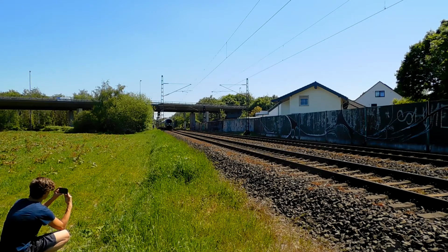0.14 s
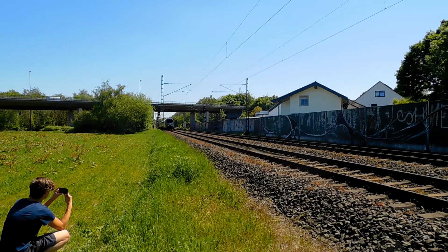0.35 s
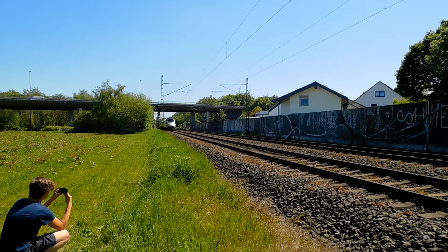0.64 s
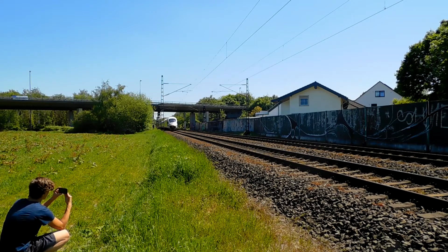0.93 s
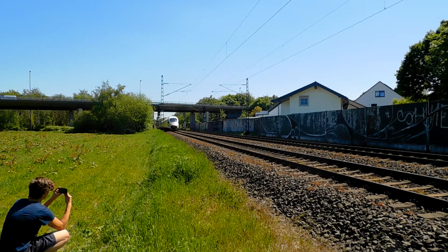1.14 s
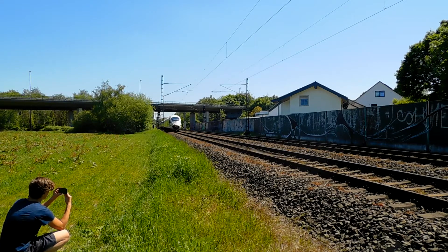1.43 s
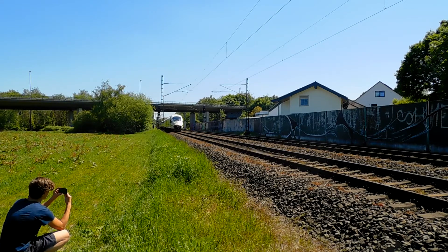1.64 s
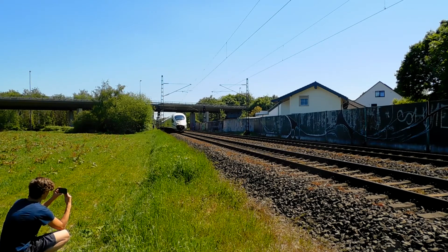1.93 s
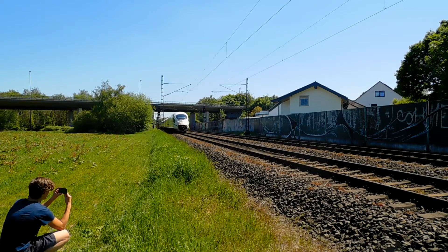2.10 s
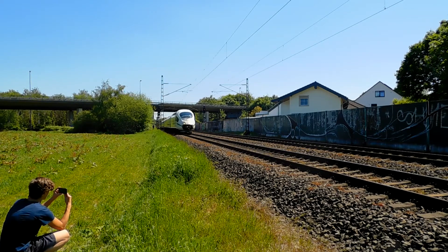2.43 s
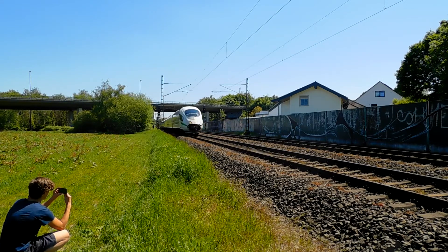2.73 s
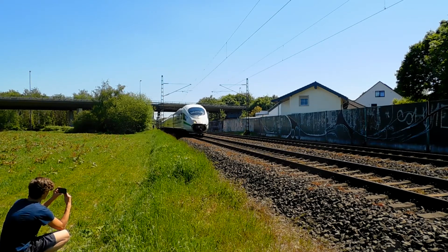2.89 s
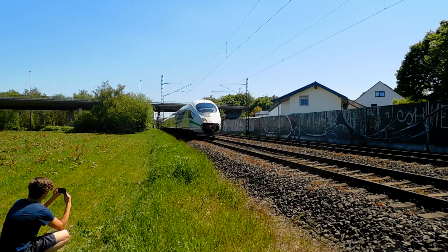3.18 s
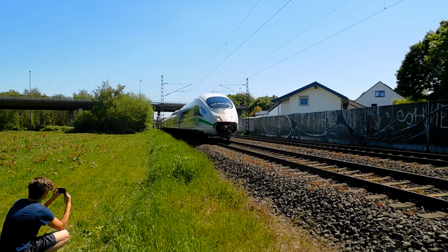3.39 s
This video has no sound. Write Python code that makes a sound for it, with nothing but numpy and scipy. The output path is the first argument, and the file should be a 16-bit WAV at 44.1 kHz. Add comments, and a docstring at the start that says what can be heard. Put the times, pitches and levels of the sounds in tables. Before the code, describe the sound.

Train approaching outdoors: faint rail ringing and traffic wash first, then irregular chirpy knocks grow louder with thin high hiss, and wheel and air roar builds last. Close-spaced stereo microphones stand beside the track.

```python
"""A fast electric train nears an open trackside, heard by two close microphone ports.
From the start: suburb and ground rumble (shaped noise), gusty wind (low noise), a dull wash that soon dies
(resonant noise), rail ring around 1 kHz (noise-driven resonances) and rail sizzle with a thin whistle.
From 0.2 s sliding tone bursts knock about ten times a second and ring the rail. Wheel and air roar (shaped
noise) first drops, stays low until about 0.7 s, then swells toward the end.
Near 3.2 s one faint bright snap: a noise burst with a short tone."""
import sys
import numpy as np
from scipy import signal
from scipy.fft import rfft, irfft
from scipy.io import wavfile

SR = 44100
rng = np.random.default_rng(int(sys.argv[2]) if len(sys.argv) > 2 else 0)


def generate_wav(sig):
    """Save sig (samples, or channels by samples) to the path in sys.argv[1] as 16-bit PCM at SR."""
    pcm = np.round(np.clip(np.atleast_2d(sig).T, -1, 1) * 32767).astype(np.int16)
    wavfile.write(sys.argv[1], SR, pcm)


def gain_from_db(level_db):
    """Turn a decibel level (scalar or array-like) into a linear amplitude factor."""
    decades = np.asarray(level_db, float) / 20
    return 10 ** decades


N = 156555
SECONDS, HZ = np.arange(N) / SR, np.fft.rfftfreq(N, 1 / SR)
REF_S = 2.5  # time at which gliding and swelling settings hold

# Traffic wash and high hiss. Each row: frequency in Hz, relative density in dB per Hz.
SUBURB_SPECTRUM = [(71, -56), (120, -21), (300, -17), (469, -4.5), (575, -5.5), (750, -1.5), (1170, 0),
                   (1430, -2.5), (2000, -6), (2750, -13.5), (3730, -25), (5000, -46), (7000, -77),
                   (8300, -57), (10300, -64), (12500, -33), (15500, -35)]
SUBURB_DB = -41.5
# Ground rumble. Each row: frequency in Hz, relative density in dB per Hz.
RUMBLE_SPECTRUM = [(30, -13), (60, -1.5), (95, -4.5), (130, -15), (200, -13), (300, -43)]
RUMBLE_START_DB, RUMBLE_SWELL_DB_PER_S, RUMBLE_PATCHY_DB = -68, 4, 2
# Gusts on the ports. Each row: time in seconds, level in dB.
WIND_GUSTS = [(0.0, -59), (0.16, -59.5), (0.77, -73), (1.0, -65), (1.16, -69), (1.18, -55.5), (1.54, -63.5),
              (1.6, -86), (1.72, -58), (3.12, -74), (3.44, -70), (3.55, -79)]
WIND_LOW_HZ, WIND_TOP_HZ = 18, 59
WASH_START_DB, WASH_FADE_S, WASH_HZ, WASH_WIDTH_HZ = -43.5, 0.15, 715, 240

# Source strengths before trims. Each row: time in seconds, rail ring, wheel and air roar, rail sizzle in dB.
APPROACH_LEVELS = [(0.0, -52, -53.5, -75.5), (0.04, -44.5, -61, -66), (0.68, -45.5, -61, -66.5),
                   (1.1, -38.5, -57.5, -62.5), (1.41, -40, -58.5, -62.5), (1.71, -31, -55, -55.5),
                   (1.96, -33.5, -52, -57), (2.32, -32, -51.5, -53), (2.44, -31, -50.5, -51.5),
                   (2.71, -35.5, -50.5, -53), (3.0, -30, -48, -52.5), (3.18, -31, -45, -48.5),
                   (3.5, -34, -41, -48), (3.55, -29, -38.5, -49)]
RAIL_TRIM_DB, ROAR_TRIM_DB, SIZZLE_TRIM_DB = 0.5, 13, 1.5
# Ringing bands of the rail. Each row: centre in Hz at REF_S, width of one resonator pass in Hz,
# relative level in dB at REF_S, extra swell in dB per s, glide in Hz per s.
RAIL_RESONANCES = [(468.8, 23.5, -19.5, 7.5, 3), (661.5, 72, -12, 5.5, -7), (844, 117, -12, 5, -6),
                   (967, 92, -8, -2.5, -6), (1062.4, 59, -1.5, 2, -39), (1145, 83, -6, -1, -9.5),
                   (1305.4, 121, -2, -1.5, -4), (1415, 69, -3, 0.5, -3), (1469, 18, -6.5, 6.5, 2.7),
                   (1501, 56, -9.5, -4.5, -8.5), (1582.5, 32, -8.5, -0.5, -8), (1681, 127, -11.5, -1.5, -6),
                   (2120, 400, -31.5, 0, 11), (2346, 230, -13.5, 0, -2)]
RAIL_FLUTTER_DB, RAIL_FLUTTER_HZ = 2.5, 10.6
RAIL_WANDER_SHARE, RAIL_WANDER_HZ = 0.008, 7  # pitch spread as a share of the centre
RATTLE_DB, RATTLE_RISE_S = -10, 0.011
RATTLE_TAIL_S, RATTLE_TAIL_GROWTH_PER_S = 0.01, 0.97  # tail at REF_S and its growth exponent
KNOCK_RING_DB = -30
# Rail sizzle. Each row: frequency in Hz, relative density in dB per Hz.
SIZZLE_SPECTRUM = [(4000, -44), (5000, -7), (5400, -1.5), (5950, -7), (6300, -30), (6850, -38), (7500, -7),
                   (8200, 1), (8450, -0.5), (9100, -1.5), (9600, 1), (10200, -11.5), (10800, 0.5),
                   (11500, -9.5), (12400, 4), (12650, -9), (12900, 6), (13300, -1), (13900, -3.5),
                   (14300, -4.5), (15500, -2)]
SIZZLE_FLUTTER_DB = 0.8
WHISTLE_HZ, WHISTLE_WIDTH_HZ = 5775, 45
WHISTLE_DB, WHISTLE_SWELL_DB_PER_S = -20, 4.5  # relative to the sizzle, at REF_S
WHISTLE_FLUTTER_DB, WHISTLE_FLUTTER_HZ = 3.5, 14
# Wheel and air roar. Each row: frequency in Hz, relative density in dB per Hz.
ROAR_SPECTRUM = [(71, -42), (120, -23), (200, -30.5), (398, -14), (519, -18), (995, -1), (2200, -18.5),
                 (4000, -25.5), (6000, -34.5), (8000, -38), (10500, -43), (15500, -77)]
ROAR_PATCHY_DB = 0.74

# Knocks along the rail. Each row: time of the peak in seconds, level in dB before trim, pitch in Hz at the peak.
RAIL_KNOCKS = [(0.169, -31, 1290), (0.357, -30, 1230), (0.621, -27.5, 1510), (0.67, -29, 1140),
               (0.717, -24, 1320), (0.764, -31, 1270), (0.852, -31, 1245), (0.95, -29, 1310),
               (1.036, -25.5, 1150), (1.126, -33, 1190), (1.345, -27.5, 1220), (1.415, -31, 1360),
               (1.531, -21, 1456), (1.629, -22, 1200), (1.689, -18, 1290), (1.707, -17, 1570),
               (1.726, -18.5, 1150), (1.815, -22, 1330), (2.014, -17.5, 1178), (2.11, -14.5, 1183),
               (2.136, -22, 1176), (2.207, -16, 1380), (2.313, -18.5, 1230), (2.399, -18.5, 1500),
               (2.488, -20.5, 1126), (2.504, -19, 1117), (2.533, -23, 1065), (2.591, -18.5, 1110),
               (2.693, -20, 1176), (2.734, -25, 1060), (2.779, -20, 1320), (2.793, -17.5, 1110),
               (2.875, -21.5, 1330), (2.889, -28.5, 1320), (2.978, -20, 1085), (2.996, -22.5, 1080),
               (3.08, -18, 1364), (3.113, -21.5, 1100), (3.334, -19, 1320), (3.375, -16, 854),
               (3.463, -18.5, 980), (3.485, -23, 940)]
KNOCK_TRIM_DB, KNOCK_RISE_S, KNOCK_FALL_S = -2, 0.0033, 0.0047
KNOCK_GLIDE_HZ_PER_S, KNOCK_GLIDE_FADE_PER_S = -12000, 0.4  # slide at REF_S, flatter for later knocks
SNAP_S, SNAP_DB, SNAP_FALL_S, SNAP_LOW_HZ, SNAP_TOP_HZ = 3.1732, -31.5, 0.001, 6000, 13500
SNAP_RING_HZ, SNAP_RING_DB, SNAP_RING_FALL_S = 1630, -21, 0.0031

# Hearing of the ports. Each row: frequency in Hz, power share heard alike (0 to 1), left lead in radians,
# left minus right level in dB.
PORT_RESPONSE = [(43, 0.81, 0.0, -0.4), (300, 0.98, -0.1, -0.0), (560, 0.94, -0.2, 0.5),
                 (730, 0.76, -0.3, -0.3), (820, 0.93, -0.4, -0.2), (904, 0.69, -0.5, 3.6),
                 (960, 0.08, -1.3, 0.5), (1033, 0.8, -0.6, -2.9), (1076, 0.89, -0.4, 0.4),
                 (1130, 0.8, -0.7, 4.1), (1190, 0.48, -2.2, 0.9), (1270, 0.77, -1.6, -4.5),
                 (1335, 0.9, -1.2, -1.4), (1421, 0.81, -2.0, 2.3), (1464, 0.86, -2.2, 2.8),
                 (1550, 0.69, -2.1, -4.4), (1600, 0.79, -1.7, -2.9), (1700, 0.43, -1.7, 2.4),
                 (1765, 0.12, -2.0, 0.1), (1830, 0.58, 0.0, -0.3), (1937, 0.35, -0.5, -0.5),
                 (2050, 0.71, -0.2, -1.2), (2200, 0.36, -1.7, -1.6), (2350, 0.16, -1.7, -5.7),
                 (2500, 0.35, -1.0, -2.1), (2650, 0.44, 0.0, -3.2), (3300, 0.25, 0.3, -1.9),
                 (4300, 0.3, 0.2, -0.3), (5800, 0.51, 0.7, -4.8), (7400, 0.48, -0.6, -2.2),
                 (8200, 0.7, -1.2, -3.1), (9000, 0.45, -2.1, -4.3), (9733, 0.59, -3.3, -4.9),
                 (10800, 0.36, -4.2, -5.7), (11500, 0.15, -4.5, -1.4), (12500, 0.49, -4.8, -2.2),
                 (13500, 0.16, -4.8, -1.0), (15000, 0.38, -8.6, -2.3)]


def rms_one(x):
    """Scales to unit rms."""
    return x / np.sqrt(np.mean(x ** 2) + 1e-20)


def at_hz(points, hz):
    """Reads a spectrum along log frequency."""
    point_hz, db = np.array(points).T
    return np.interp(np.log(hz + 1), np.log(point_hz + 1), db)


def drift(corner_hz):
    """Random modulation of spread 1: noise low-passed twice, made at SR / 40."""
    r = np.exp(-80 * np.pi * corner_hz / SR)
    noise = rng.standard_normal(N // 40 + 2002)
    slow = signal.lfilter([1], [1, -2 * r, r * r], noise)[2000:]  # drop the settling
    return np.interp(np.arange(N) / 40, np.arange(len(slow)), rms_one(slow))


def paths():
    """Three unrelated noises: one shared by both ports, then one of its own for each."""
    return rng.standard_normal((3, N))


def resonate(x, hz, width_hz, glide_hz_per_s=0.):
    """Gliding resonance, two passes: shift its centre to zero, low-pass, shift back."""
    r = np.exp(-np.pi * width_hz / SR)
    centre_hz = hz + glide_hz_per_s * (SECONDS - REF_S)
    turn = np.exp(2j * np.pi * np.cumsum(centre_hz) / SR)
    low = signal.lfilter([(1 - r) ** 2], [1, -2 * r, r * r], x / turn)
    return np.real(turn * low) * 2 * np.sqrt(SR / width_hz)


def coloured(spectrum, patchy_db):
    """Noise of a given spectrum whose overlapping octaves flicker apart; rms 1."""
    shaped = rfft(paths()) * gain_from_db(at_hz(spectrum, HZ))
    out = 0
    for low_hz in 16 * 2. ** np.arange(10):
        octaves = np.clip(np.log2((HZ + 1) / low_hz) - 1, -1, 1)
        share = np.cos(octaves * np.pi / 2) ** 2
        out = out + irfft(shaped * share, N) * gain_from_db(patchy_db * drift(5.5))
    return rms_one(out)


def suburb():
    """Steady traffic wash and hiss as shaped noise."""
    return gain_from_db(SUBURB_DB) * coloured(SUBURB_SPECTRUM, patchy_db=0.0)


def rumble():
    """Ground rumble as low noise, swelling at a steady dB rate."""
    return gain_from_db(RUMBLE_START_DB + RUMBLE_SWELL_DB_PER_S * SECONDS) * coloured(RUMBLE_SPECTRUM, RUMBLE_PATCHY_DB)


def wind():
    """Gusty buffeting of the ports as low band noise."""
    band = signal.butter(3, [WIND_LOW_HZ, WIND_TOP_HZ], "band", fs=SR, output="sos")
    gust_db = np.interp(SECONDS, *np.transpose(WIND_GUSTS))
    return rms_one(signal.sosfilt(band, paths())) * gain_from_db(gust_db)


def wash():
    """Dull rush: resonant noise dying away exponentially."""
    noise = rms_one(resonate(paths(), WASH_HZ, WASH_WIDTH_HZ))
    return gain_from_db(WASH_START_DB) * np.exp(-SECONDS / WASH_FADE_S) * noise


def rattle_power():
    """Power of the rattle around each knock, its tail longer as the train nears."""
    tail_s = RATTLE_TAIL_S * np.exp(RATTLE_TAIL_GROWTH_PER_S * (SECONDS - REF_S))
    power = 0
    for s, db, _ in RAIL_KNOCKS:
        spread_s = np.where(SECONDS < s, RATTLE_RISE_S, tail_s)
        power = power + gain_from_db(db + RATTLE_DB) ** 2 * np.exp(-((SECONDS - s) / spread_s) ** 2)
    return power


def rail(level_db, knocking):
    """Wheel roughness and knocks shake the rail's fluttering bands; the last row is the ring of the knocks."""
    force = np.sqrt(gain_from_db(level_db + RAIL_TRIM_DB) ** 2 + rattle_power())
    noise = [paths(), paths()]  # neighbouring bands take turns
    out = 0
    for k, (hz, width_hz, db, swell, glide) in enumerate(RAIL_RESONANCES):
        flutter_db = RAIL_FLUTTER_DB * drift(RAIL_FLUTTER_HZ)
        gain = gain_from_db(db - 6 + swell * (SECONDS - REF_S) + flutter_db)
        shake = np.vstack([noise[k % 2] * force * gain, knocking * gain_from_db(db + KNOCK_RING_DB)])
        wander = RAIL_WANDER_SHARE * np.minimum(width_hz / 60, 1) * drift(RAIL_WANDER_HZ)  # less if narrow
        out = out + resonate(shake, hz * (1 + wander), width_hz, glide)
    return out


def sizzle(level_db):
    """High hiss of the rail, with a thin resonant whistle growing out of it."""
    flutter_db = WHISTLE_FLUTTER_DB * drift(WHISTLE_FLUTTER_HZ)
    whistle_db = WHISTLE_DB + WHISTLE_SWELL_DB_PER_S * (SECONDS - REF_S) + flutter_db
    whistle = resonate(paths(), WHISTLE_HZ, WHISTLE_WIDTH_HZ) * gain_from_db(whistle_db)
    return gain_from_db(level_db + SIZZLE_TRIM_DB) * (coloured(SIZZLE_SPECTRUM, SIZZLE_FLUTTER_DB) + whistle)


def roar(level_db):
    """Wheel and air roar as patchy shaped noise."""
    return gain_from_db(level_db + ROAR_TRIM_DB) * coloured(ROAR_SPECTRUM, ROAR_PATCHY_DB)


def knocks():
    """Short tone bursts sliding down, since high waves run faster in the rail."""
    out = np.zeros(N + SR)
    t = np.arange(-int(0.015 * SR), int(0.03 * SR)) / SR
    shape = np.exp(-0.5 * (t / np.where(t < 0, KNOCK_RISE_S, KNOCK_FALL_S)) ** 2)
    for (s, db, hz), turn in zip(RAIL_KNOCKS, rng.random(len(RAIL_KNOCKS))):
        glide = KNOCK_GLIDE_HZ_PER_S * np.exp(KNOCK_GLIDE_FADE_PER_S * (REF_S - s))
        tone = np.sin(2 * np.pi * (hz * t + 0.5 * glide * t * t + turn))
        i = int((s + t[0]) * SR)
        out[i:i + len(t)] += gain_from_db(db + KNOCK_TRIM_DB) * shape * tone
    return out[:N]


def snap():
    """One bright tick: a decaying band-passed noise burst and a short decaying tone."""
    t = SECONDS - SNAP_S
    after = np.clip(t, 0, 1)
    burst = paths() * (t > 0) * np.exp(-after / SNAP_FALL_S)
    band = signal.butter(2, [SNAP_LOW_HZ, SNAP_TOP_HZ], "band", fs=SR, output="sos")
    ring = (t > 0) * np.exp(-after / SNAP_RING_FALL_S) * np.sin(2 * np.pi * SNAP_RING_HZ * t)
    return gain_from_db(SNAP_RING_DB) * ring + gain_from_db(SNAP_DB) * signal.sosfilt(band, burst)


def two_ports(field, blows):
    """Per frequency, the ports share part of the field and all blows, with a phase lead and level tilt."""
    # mirrored so that the ends join without a step
    mirrored = np.pad(np.vstack([field, blows]), [(0, 0), (0, N)], "symmetric")
    shared, *own, blows = rfft(mirrored)
    hz, *columns = np.transpose(PORT_RESPONSE)
    alike, lead_rad, tilt_db = [np.interp(np.fft.rfftfreq(2 * N, 1 / SR), hz, c) for c in columns]
    alike = np.clip(alike, 0, 1)
    side = np.array([[0.5], [-0.5]])  # left, right
    common = (np.sqrt(alike) * shared + blows) * np.exp(1j * side * lead_rad)
    ports = common + np.sqrt(1 - alike) * np.array(own)
    return irfft(ports * gain_from_db(side * tilt_db), 2 * N)[:, :N]


def scene():
    """Sums the sources and hears them through the two ports."""
    s, *columns = np.transpose(APPROACH_LEVELS)
    rail_db, roar_db, sizzle_db = [np.interp(SECONDS, s, c) for c in columns]
    knocking = knocks()
    ringing = rail(rail_db, knocking)
    background = suburb() + rumble() + wind() + wash()
    field = background + ringing[:3] + sizzle(sizzle_db) + roar(roar_db) + snap()
    return two_ports(field, knocking + ringing[3])


def low_pass(x):
    """Removes everything above the highest recorded frequency."""
    return signal.sosfilt(signal.butter(12, 15690, fs=SR, output="sos"), x)


def record(dry):
    """Delivers the finished two-port mix."""
    return low_pass(dry)


dry = scene()
out = record(dry)
generate_wav(out)
```